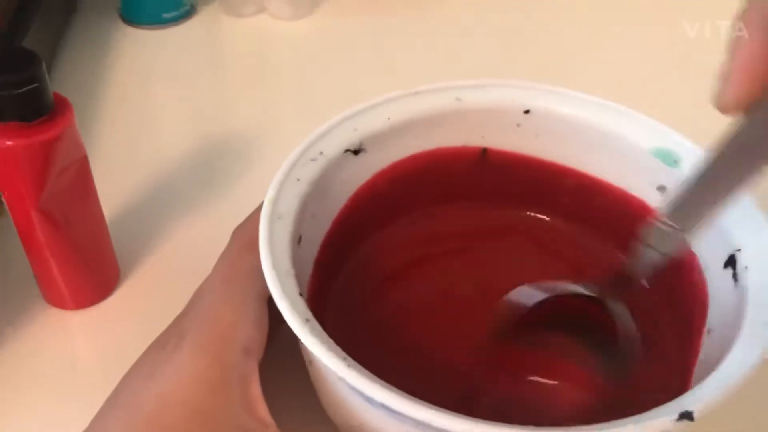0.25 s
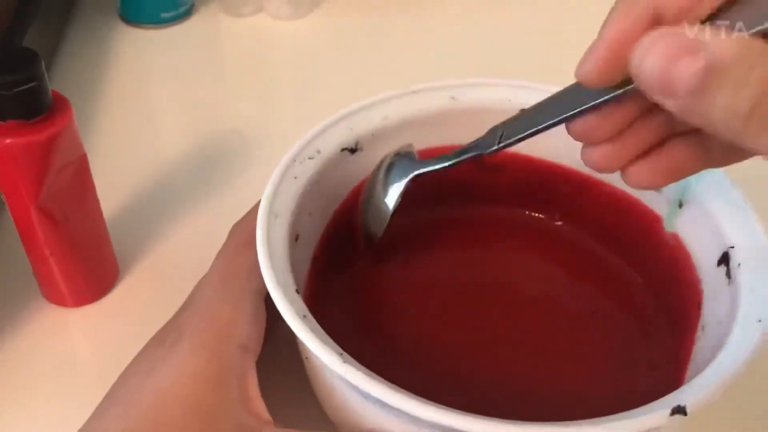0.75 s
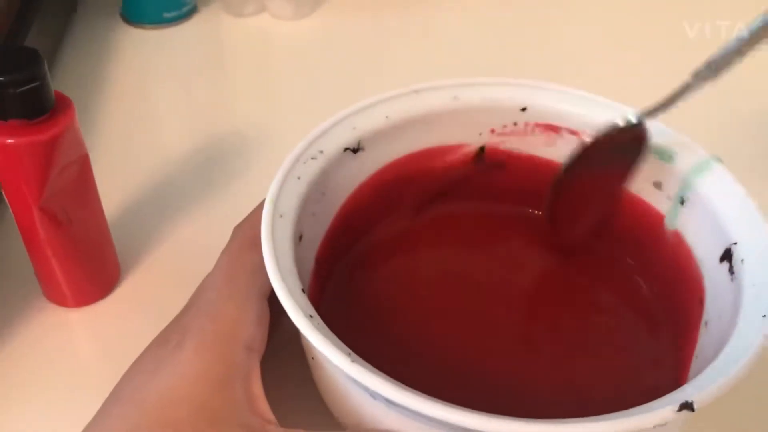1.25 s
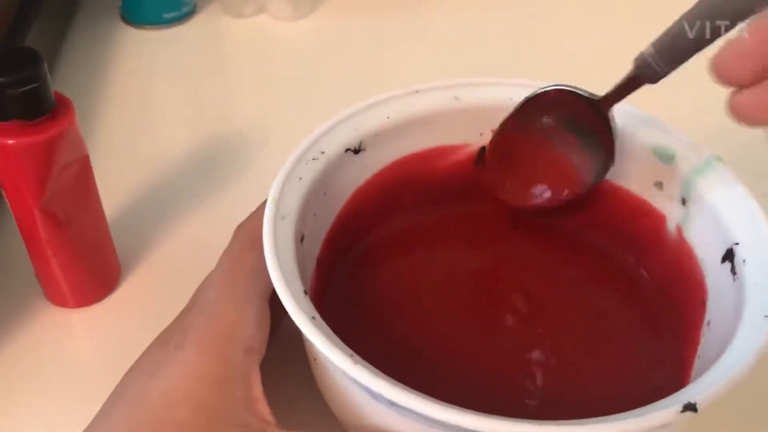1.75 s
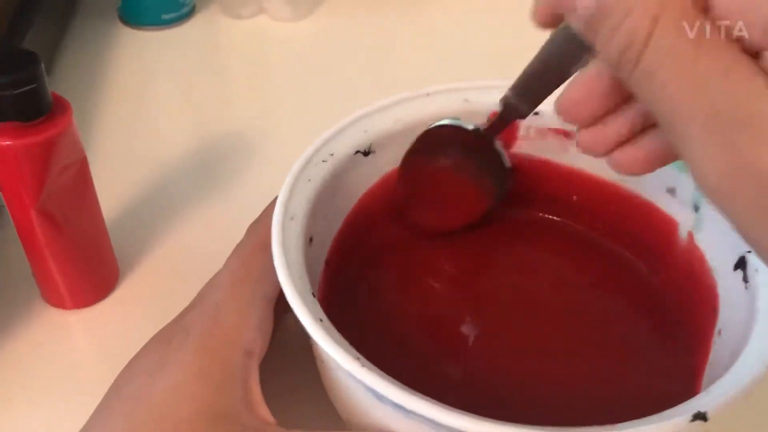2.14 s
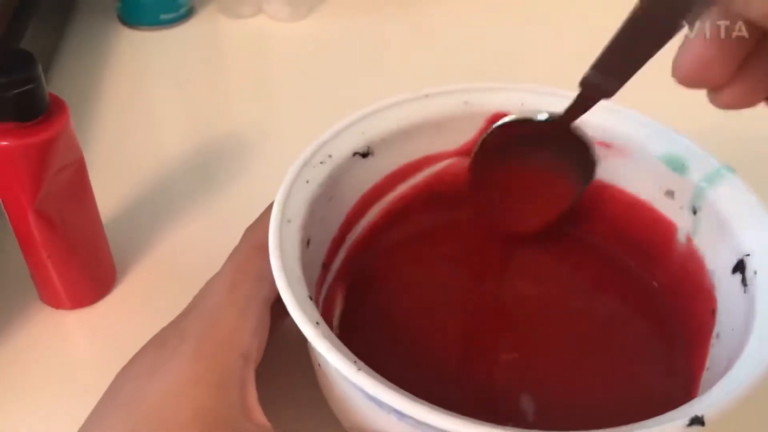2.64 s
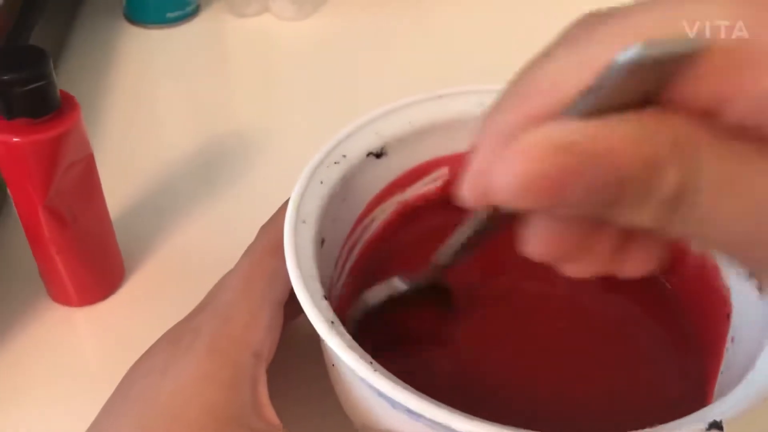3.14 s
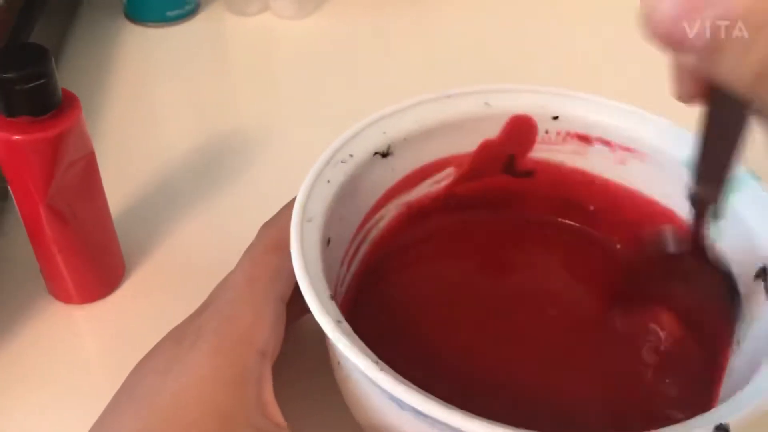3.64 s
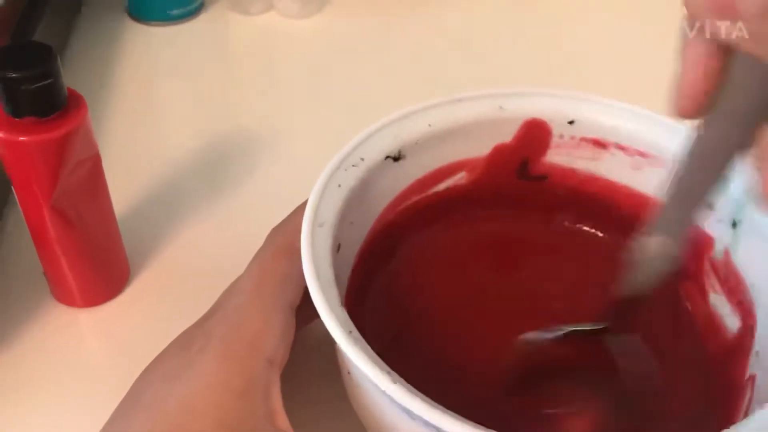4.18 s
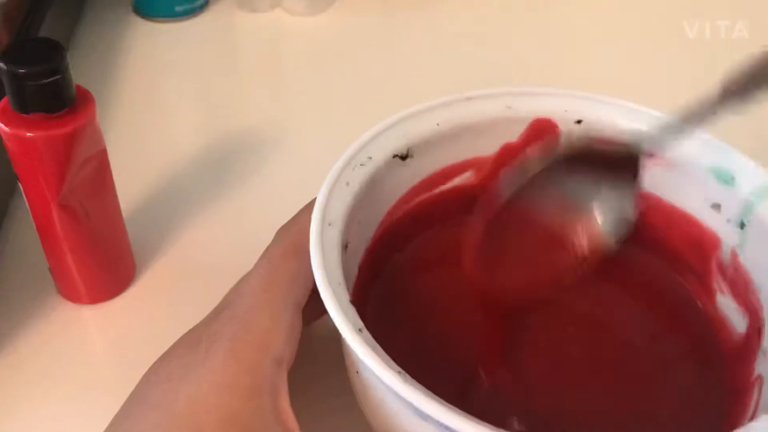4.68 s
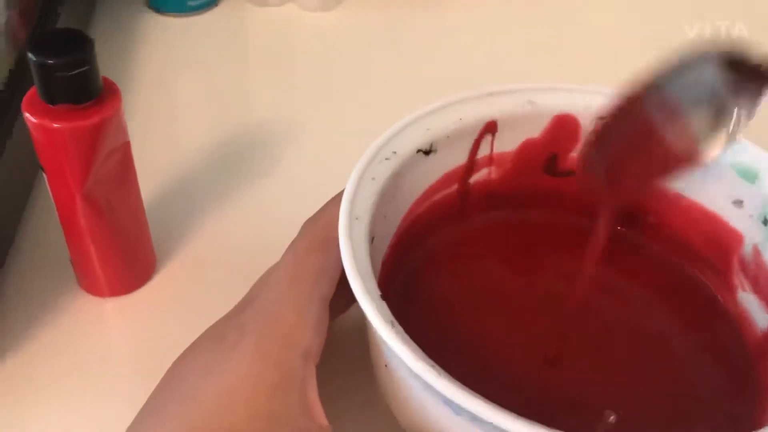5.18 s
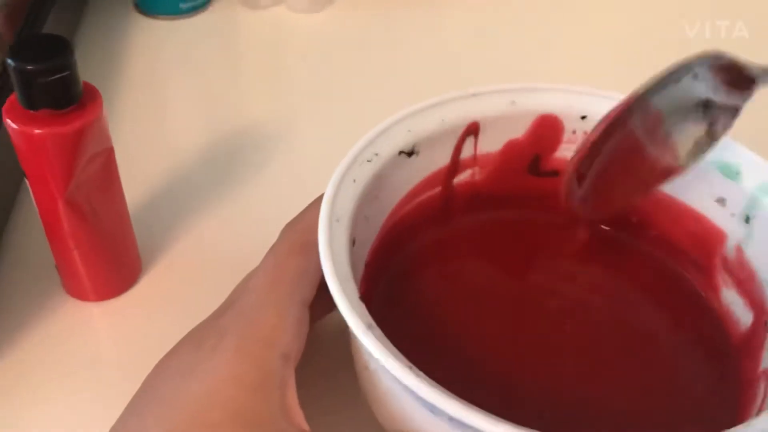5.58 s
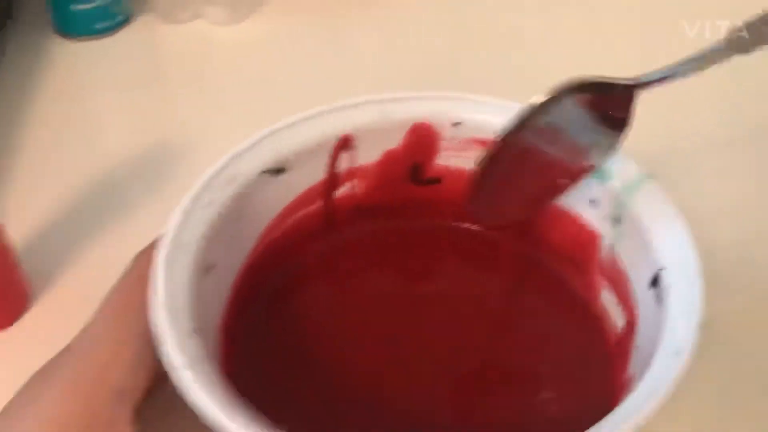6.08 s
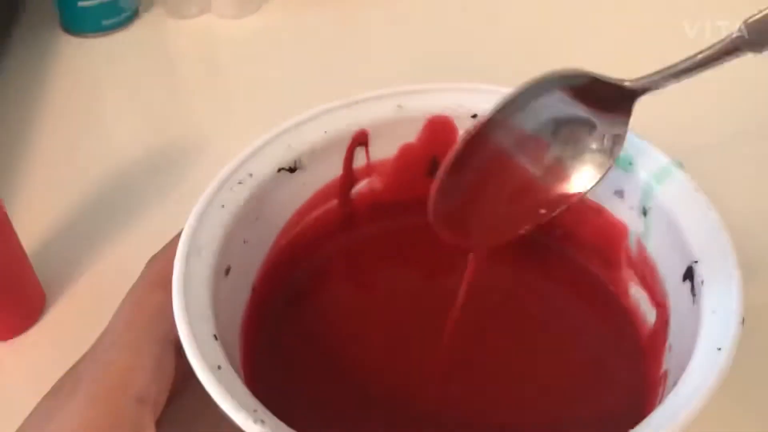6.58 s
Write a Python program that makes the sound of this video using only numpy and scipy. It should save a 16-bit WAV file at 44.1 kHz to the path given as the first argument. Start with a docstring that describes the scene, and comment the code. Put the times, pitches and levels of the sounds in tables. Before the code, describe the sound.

A close phone microphone in a quiet, hard-walled room with faint hum. At 0-0.15 s a steel spoon rasps hard inside a plastic tub of thick slime; distant bird chirps flutter at 0.3-0.5. A knock at 0.77 and a sharper double tap at 1.05 lead into short gritty scrapes until 1.4, with faint bird notes. A dull clank lands at 2.28 with a soft table thud, after bright chirps at 2.1. A low, droning drag leads to the strongest blunt knock at 3.05, then lighter clinks at 3.3 and a cluster at 3.6. From 3.7 to 4.45 scraping is dense, hissy and juddering, with small taps and a loud warbling chirp at 4.3. A thud at 4.9, near silence, a tiny click at 5.67. At 5.95 a bright double clank rings freely with a table thump. Bird squawks echo at 6.25-6.5; a tiny click and faint bump end it.

```python
"""A steel spoon stirs thick slime in a plastic tub, close to a phone microphone: noise shaped by tip, wall and
tub makes the drag, and jolts with decaying sines make the knocks and the steel ring. The tub thuds on the table
(sagging sines with a rumble) and the slime gives three thin popping clicks. A pet bird chirps and squawks far
off in a hard-walled room (gliding overtones with echo), over a faint room hum of shaped noise."""
import sys
import numpy as np
from scipy import signal
from scipy.fft import rfft, irfft, next_fast_len
from scipy.io import wavfile
from scipy.ndimage import uniform_filter1d, map_coordinates

SR = 44100
rng = np.random.default_rng(int(sys.argv[2]) if len(sys.argv) > 2 else 0)


def dump_mix(stems):
    """Bounce the given channels to the path in sys.argv[1] as a 16-bit WAV at rate SR."""
    frames = np.atleast_2d(stems).T  # one column per channel
    limited = np.clip(frames, -1, 1)  # hard clip at full scale
    pcm = np.round(limited * 32767).astype(np.int16)
    wavfile.write(sys.argv[1], SR, pcm)


N = 300762  # samples

# Resonances of the spoon tip under load: f/Hz, width before widening/Hz, relative level/dB
TIP_MODES = [(3860, 320, -1.5), (4370, 150, 1), (5380, 120, 5), (7790, 420, -9), (8680, 260, -3.5),
             (10140, 120, -4.5), (10800, 78, -10), (11940, 250, -5.5), (14000, 1400, -10.5)]
# Resonances of the tub wall: f/Hz, width before widening/Hz, relative level/dB
WALL_MODES = [(734, 46, -11.5), (1129, 59, 2.5), (1410, 120, -2.5), (1906, 88, 2.5), (3420, 190, -9)]
# Resonances of the tub body and its air: f/Hz, width before widening/Hz, relative level/dB
TUB_MODES = [(120, 26, -2), (246, 54, -8.5), (401, 48.6, 1.5)]
# Free modes of the spoon: f/Hz, relative level/dB, ring time scale/s
STEEL_MODES = [(768, -15.5, .3), (1923, 0, .28), (3488, -13, .24), (4170, -35, .3), (5265, -30, .35),
               (5405, -27, .4), (6460, -33, .14), (7600, -42, .25), (8672, -50, .2), (11035, -44, .25),
               (12315, -33, .12)]
# Strokes along the wall: tub drone over the rasp/dB, lean on the wall (-1..1),
# [t/s, hiss of the sliding tip/dB, rasp of the pressed wall/dB], levels before judder
STROKES = [ (-8.5, -0.1, [(0, -51, -40.5), (.05, -47, -46.5), (.1, -40.5, -41.5), (.145, -43, -44.5),
           (.165, -91, -72), (.24, -86, -84)]), (-11.5, 0.86, [(.8, -61.5, -52), (.85, -65, -66),
           (.92, -58, -74.5), (1.02, -57, -53.5), (1.047, -50.5, -41)]), (-16, 0.53, [(1.075, -45, -38.5),
           (1.17, -51, -40), (1.22, -59, -59)]), (1.5, -0.2, [(1.225, -56, -61), (1.27, -50, -53),
           (1.31, -56.5, -51.5), (1.4, -75.5, -64)]), (7.5, 0.4, [(1.78, -89, -68), (1.82, -79, -63.5),
           (1.98, -57.5, -68), (2.1, -55.5, -83), (2.284, -51, -70.5)]), (6.5, -0.1, [(2.3, -57, -46),
           (2.36, -51, -54), (2.44, -70, -70)]), (11, 0.7, [(2.78, -76.5, -68), (2.89, -64, -71),
           (2.94, -48, -69), (3.0, -51.5, -66), (3.052, -51.5, -58.5)]), (7, -0.2, [(3.085, -49.5, -40.5),
           (3.13, -51.5, -51.5), (3.2, -52, -66.5), (3.25, -64, -71)]), (-2.5, 0.2, [(3.69, -42.5, -38),
           (3.78, -57, -44), (3.9, -49, -48), (3.955, -54.5, -43), (4.075, -47.5, -44.5),
           (4.095, -31.5, -40.5), (4.15, -32, -36), (4.195, -60.5, -44), (4.23, -37.5, -41.5),
           (4.29, -52, -53), (4.345, -54.5, -43), (4.39, -50, -49.5), (4.44, -42, -40.5),
           (4.465, -68.5, -72.5), (4.88, -76, -80.5)]), ]
# Bird notes: t/s, length/s, first f/Hz, last f/Hz, relative level/dB, step per overtone/dB, harshness (0..1)
BIRD_NOTES = [(0.305, 0.027, 1570, 1370, -51, -11.5, 0.06), (0.32, .05, 2464, 2470, -51.5, -33, 0.03),
              (0.347, 0.069, 3493, 2650, -46, -22, 0.07), (0.375, 0.026, 2180, 1509, -46, -17, 0.07),
              (0.407, 0.0064, 2840, 2830, -34.5, -27, 0.08), (0.418, 0.0472, 1848, 1604, -46.5, -12, .07),
              (0.439, .07, 2722, 2436, -48, -37, .08), (0.472, 0.037, 2010, 1285, -46.5, -18, .16),
              (0.507, .035, 864, 1026, -57.5, -7.5, 0.08), (0.945, 0.079, 1597, 1464, -53, -7.5, .08),
              (1.367, 0.041, 1270, 1196, -54, -5, 0.07), (1.404, .09, 1017, 994, -52, -8, 0.07),
              (1.503, 0.11, 1216, 1080, -55.5, -8.5, .12), (2.086, 0.033, 3034, 3180, -50, -26, 0),
              (2.092, 0.042, 2308, 1825, -41.5, -24, 0.07), (2.124, 0.034, 3290, 2800, -38, -35, 0.07),
              (2.147, .025, 2750, 3660, -27.5, -24.5, 0.07), (4.265, 0.04, 2016, 2420, -38, -29, 0.1),
              (4.286, .03, 3687, 3140, -33.5, -15, 0.1), (4.306, 0.021, 3155, 3240, -25, -30, 0.03),
              (4.967, 0.031, 2193, 2112, -56, -17, 0.27), (4.97, 0.24, 1575, 1527, -66, -4, .17),
              (5.36, 0.081, 1584, 1502, -68.5, -4.5, 0.22), (6.249, 0.12, 1388, 1523, -43.5, -3, 0.16),
              (6.276, 0.078, 3503, 3525, -30.5, -10, 0.32), (6.335, 0.128, 1007, 1057, -44, -3, 0.01),
              (6.456, 0.084, 1686, 1347, -50, -7, 0.1)]
# Knocks: t/s, relative level/dB, then treble crack, tub and steel ring relative to it/dB,
# share of the ring time left by the slime
KNOCKS = [(0.7681, -18.5, -1.5, -24.5, -11, 0.26), (1.0434, -8.5, -8.5, -21.5, -6.5, 0.21),
          (1.0514, -11, -3, -24, -15.5, 0.25), (1.266, -38.5, -2.5, -6.5, -10, 0.18),
          (1.278, -33, -1, -4, -2.5, 0.16), (2.2826, -7.5, -11, -9, -10, 0.076),
          (2.8796, -48, 13, -9.5, -21.5, 0.68), (2.973, -43.5, 7.5, -13.5, -12, 0.074),
          (3.049, 2, -14, -15.5, -17.5, 0.19), (3.06, -8, -6.5, -5.5, -10.5, 0.18),
          (3.1092, -25.5, -17, -18.5, -1.5, 0.093), (3.302, -17, -10, -22, -8.5, 0.63),
          (3.5805, -19, -4, -19.5, -12, 0.38), (3.5855, -20, -10, -22.5, -3, 0.54),
          (3.6228, -2.5, -9, -10, -14.5, 0.35), (3.6589, -9, -3.5, -11, -9.5, 0.76),
          (3.8644, -17, -22.5, -8.5, -14.5, 0.16), (3.9372, -28, -19.5, -3.5, -7.5, 0.088),
          (3.969, -29, -3.5, -12, -17, 0.19), (3.9752, -15.5, -24, -10.5, -14, 0.095),
          (4.2179, -32.5, -6, -2.5, -8, .15), (4.2662, -32, -1.5, -30, -13.5, 0.19),
          (4.3294, -26.5, -2.5, -38, -7.5, 0.17), (4.36, -18.5, -26, -31, -7.5, 0.13),
          (4.4196, -32.5, -8.5, -34, -1, 0.1), (5.9423, -5, -1.5, -6, -3, 0.97),
          (5.9577, -5.5, -6, -11, -15.5, 0.96), (6.6877, -44.5, -3, 4.5, -17, .3)]
# Tub landing on the table: t/s, relative level/dB, settled f/Hz
THUDS = [(0.8, -47.5, 124), (2.204, -46, 240), (2.299, -30, 122.8), (2.822, -44.5, 129.4),
         (3.058, -31, 119.3), (3.621, -39, 114), (4.902, -30.5, 89), (5.944, -21, 168.6),
         (6.548, -46.5, 485), (6.713, -46.5, 127.4)]
# Tiny dry clicks: t/s, relative level/dB
TICKS = [(2.456, -42.5), (5.668, -47.5), (6.6172, -48.5)]
# Spectrum of the room tone: f/Hz, relative level per Hz/dB
HUM_SPECTRUM = [(25, -31.5), (50, 0), (120, -1.5), (200, -8), (400, -13), (800, -18), (2000, -20),
                (5000, -28), (10000, -31.5), (16000, -29)]
# Reverberation of the room: f/Hz, t60/s
ROOM_DECAY = [(200, .4), (2000, 0.43), (10000, 0.21)]

SLIPS_PER_S, SLIP_DECAY_S, SLIP_DB = 180, 0.0049, -6  # sudden let-goes of the edge; time constant, size over the grit
BEND, WANDER, WANDER_PER_S = .1, .35, 7  # mode shift at full lean (share), wander of the lean, its knots/s
SING_DB, SING_WIDTH_HZ, SING_SPREAD = 13, 26.04, 0.35  # rubbed steel: drive, line width, share of the level spread
SWAY_S = 1.5e-5  # the moving spoon hastens and delays its ring by about this
BIRD_LOW_HZ = 497  # the bird's throat gives little under this
WARBLE_HZ, WARBLE_DEPTH, WARBLE_ABOVE_DB = 189, 0.063, -30.5  # rate, share of the pitch, note level needed
THUD_CYCLES, RUMBLE_CYCLES, THUD_SAG = 10, 34, 0.18  # cycles to lose 60 dB; share by which the pitch starts high
HUM_DB = -65
TOP_HZ = 15900  # band limit of the phone


def amp(db):
    """Decibels to gain."""
    return 10 ** (np.asarray(db) / 20)


def unit(x):
    """Scaled to rms 1."""
    return x / np.sqrt(np.mean(x ** 2) + 1e-20)


def along(points, hz):
    """Interpolate (Hz, value) points on a log frequency axis."""
    f, value = np.transpose(points)
    return np.interp(np.log(hz + 1), np.log(f + 1), value)


def wobble(rate, size=N):
    """A smooth random curve, rate knots a second."""
    knots = rng.standard_normal(int(size * rate / SR) + 4)
    return map_coordinates(knots, [np.arange(size) * rate / SR])


def filtered(x, response):
    """x times a complex response of frequency."""
    m = next_fast_len(N + SR // 2)
    spectrum = rfft(x, m) * response(np.fft.rfftfreq(m, 1 / SR))
    return irfft(spectrum, m)[..., :N]


def body(modes, widen):
    """Causal response of a set of resonances with alternating sign."""
    def response(f):
        total = 0
        for k, (centre, width, db) in enumerate(modes):
            damping = 1j * f * width * widen
            total = total + (-1) ** k * amp(db) * damping / (centre * centre - f * f + damping)
        return total
    return response


def add(track, s, sound):
    """Mix a sound into the track at s seconds."""
    part = track[round(s * SR):][:len(sound)]
    part += sound[:len(part)]


def room(x, delay):
    """The room's answer after delay seconds: noise in which each frequency dies at its own speed."""
    hz, t, z = signal.stft(rng.standard_normal(SR // 2), SR, nperseg=256)
    decay = amp(-60 * t / along(ROOM_DECAY, hz)[:, None])
    tail = signal.istft(z * decay, SR, nperseg=256)[1]
    delayed = np.pad(x, (round(delay * SR), 0))
    return signal.fftconvolve(delayed, tail / np.linalg.norm(tail))[:len(x)]


def patchy(x, depth_db):
    """Random gain patches in time and frequency."""
    z = signal.stft(x, nperseg=256)[2]
    field = uniform_filter1d(rng.standard_normal(z.shape), size=4, axis=-2)
    field = uniform_filter1d(field, size=16, axis=-1)
    return signal.istft(z * amp(depth_db * unit(field)), nperseg=256)[1][..., :N]


def leaning(x, modes, lean, widen):
    """Resonances that slide up and down with the lean, cross-faded between three settings."""
    total = 0
    for k in (-1, 0, 1):
        share = np.maximum(1 - abs(lean - k), 0)
        total = total + share * filtered(x, lambda f: body(modes, widen)(f / (1 + BEND * k)))
    return unit(total)


def stroke_levels():
    """Gain of tip, wall and tub, and lean, per sample; between strokes the spoon is off the wall."""
    gain, lean, t = np.zeros((3, N)), np.zeros(N), np.arange(N) / SR
    for tub_db, push, stroke in STROKES:
        s, hiss, rasp = np.transpose(stroke)
        curves = (hiss, rasp, rasp + tub_db)  # the tub drones with the wall's rasp
        gain += amp([np.interp(t, s, c, left=-150, right=-150) for c in curves])
        lean[t >= s[0]] = push
    return uniform_filter1d(gain, size=300, axis=1, mode="nearest"), lean


def drag():
    """Stick-slip grit, uneven in size, shakes tip, wall and tub together; the rubbed steel sings on its modes."""
    slips = (rng.random(N) < SLIPS_PER_S / SR) * rng.rayleigh(size=N)
    slips = signal.fftconvolve(slips, np.exp(-np.arange(SR // 20) / (SLIP_DECAY_S * SR)))[:N]
    judder_db = 0.77 * wobble(35) + 1.6 * wobble(150)  # the edge catches and lets go
    # the contact point wanders, so the favoured modes change
    noise = patchy(rng.standard_normal((3, N)), depth_db=4.0)
    grit = amp(judder_db) * (1 + amp(SLIP_DB) * slips) * noise

    gain, lean = stroke_levels()
    lean = np.clip(lean + WANDER * wobble(WANDER_PER_S), -1, 1)
    tip = unit(filtered(grit[0], body(TIP_MODES, widen=1.7)))
    wall = leaning(grit[1], WALL_MODES, lean, widen=1.0)
    tub = leaning(grit[2], TUB_MODES, lean, widen=1.0)
    gain = gain * amp([[0], [1.6], [1.4]] * wobble(90))  # wall and tub shudder in lumps

    lines = [(hz, SING_WIDTH_HZ, db * SING_SPREAD) for hz, db, _ in STEEL_MODES]
    rubbing = gain[0] * rng.standard_normal(N)
    sing = amp(SING_DB) * filtered(rubbing, body(lines, widen=1.0))
    return (gain * [tip, wall, tub]).sum(0) + sing


def hum():
    """Steady room tone, shaped noise whose level wavers a little."""
    noise = unit(filtered(rng.standard_normal(N), lambda hz: amp(along(HUM_SPECTRUM, hz))))
    return amp(HUM_DB + 0.6 * wobble(3.0)) * noise


def bird():
    """Gliding notes with overtones; harshness shakes the pitch, the loudest warble; a strong room echo follows."""
    out = np.zeros(N)
    k = np.arange(1, 15)[:, None]  # harmonic number
    for s, length, first_hz, last_hz, db, step_db, harsh in BIRD_NOTES:
        u = np.arange(round(length * SR)) / (length * SR)  # progress through the note, 0..1
        pitch = first_hz + (last_hz - first_hz) * u
        pitch = pitch * (1 + harsh * wobble(450, size=len(u)))
        warble = (db > WARBLE_ABOVE_DB) * np.sin(2 * np.pi * WARBLE_HZ * u * length)
        phase = 2 * np.pi * np.cumsum(pitch * (1 + WARBLE_DEPTH * warble)) / SR
        overtones = amp(step_db * (k - 1)) * np.sin(k * phase)
        tone = (overtones * (k * first_hz < SR / 3)).sum(0)
        attack = np.minimum(u / (0.033 + 4 * harsh ** 2), 1)  # harsh notes swell more slowly
        add(out, s, amp(db) * attack * (1 - u ** 4) * tone)
    out = filtered(out, lambda hz: (1j * hz / (BIRD_LOW_HZ + 1j * hz)) ** 4)
    return amp(1.5) * out + room(out, .004)


def knocks():
    """Each knock rings the steel, cut short by the slime, and jolts wall, tip and tub with a short burst."""
    ring, jolts, t = np.zeros(N), np.zeros((3, N)), np.arange(SR // 3) / SR
    hz, level, ring_s = np.transpose(STEEL_MODES)[..., None]
    twins = np.sin(2 * np.pi * (hz + 4) * t)  # the handle's modes lie 4 Hz off and beat with the bowl's
    flash = amp(level / 1.6 - 2.5 - 60 * t / 0.047) * (hz > 3000)  # the bowl answers brightly at first
    handle_level = np.minimum(level - 14, -35 + 4 * np.log2(hz / 1900))
    t_puff = t[:SR // 10]
    puff = amp(-60 * t_puff / np.array([[.03], [.02], [.06]]))  # wall, tip, tub: seconds to lose 60 dB
    puff = puff * (1 - np.exp(-t_puff / 0.0015))
    for s, db, crack_db, tub_db, ring_db, free in KNOCKS:
        chance_db = 0.97 * rng.standard_normal((len(STEEL_MODES), 1))
        spent = t / (ring_s * np.clip(free, .03, 1.5))  # time in units of the ring time
        flutter_db = 2.6 * np.array([wobble(60, size=len(t)) for _ in STEEL_MODES])  # from the grip
        # the handle rings on after the bowl is damped
        handle = amp(handle_level) * amp(-21 * spent + flutter_db) * twins
        modes = np.sin(2 * np.pi * hz * (t + SWAY_S * wobble(71, size=len(t))))
        # fingers and slime close in on the steel, so the ring dies ever faster
        fade = amp(level - 90.5 * spent * np.sqrt(spent)) + amp(crack_db + 11.0) * flash
        steel = (amp(chance_db) * (fade * modes + handle)).sum(0)
        add(ring, s, amp(db + ring_db) * steel)
        bursts = rng.standard_normal(puff.shape) * puff
        gains_db = (db + 6.0, db + crack_db + 13.5, db + tub_db + 17.5)
        for track, burst, gain_db in zip(jolts, bursts, gains_db):
            add(track, s, amp(gain_db) * burst)
    wall = filtered(jolts[0], body(WALL_MODES, widen=3))
    tip = filtered(jolts[1], body(TIP_MODES, widen=1.6))
    tub = filtered(jolts[2], body(TUB_MODES, widen=1.5))
    return ring, wall + tip + tub


def thuds():
    """The tub rocks and lands on the table top, a short sagging push with a longer rumble."""
    out, t = np.zeros(N), np.arange(SR // 3) / SR
    for s, db, hz in THUDS:
        rumble = unit(np.gradient(wobble(2.6 * hz, size=len(t))))
        phase = 2 * np.pi * hz * np.cumsum(1 + THUD_SAG * np.exp(-t * hz / 1.5)) / SR
        push = amp(-60 * t * hz / THUD_CYCLES) * np.sin(phase)
        push = push + .3 * amp(-60 * t * hz / RUMBLE_CYCLES) * rumble
        onset = 1 - np.exp(-t / 0.0052)
        add(out, s, amp(db + 6.5) * onset * push)
    return out


def ticks():
    """Thin clicks with no body: differenced noise that dies within 2 ms."""
    out, t = np.zeros(N), np.arange(200) / SR
    for s, db in TICKS:
        noise = np.diff(rng.standard_normal(len(t) + 1))
        add(out, s, amp(db + 0.5 - 60 * t / 0.0019) * noise)
    return out


def scene():
    """Up close, the tub is heard with some room, the thin spoon with less; the far bird brings its own."""
    ring, shells = knocks()
    tub = drag() + shells + thuds() + ticks()
    echo = room(amp(-14.0) * tub + amp(-20.5) * ring, 0.0064)
    return (tub + ring + echo + bird() + hum())[None]


def record(dry):
    """The phone drops the deepest bass, rounds off the loudest peaks and keeps nothing above its band limit."""
    thin = filtered(dry, lambda hz: (1j * hz / (40 + 1j * hz)) ** 3)
    soft = thin / (1 + np.abs(thin / .95) ** 6) ** (1 / 6)
    return filtered(soft, lambda hz: hz < TOP_HZ)


dry = scene()
out = record(dry)
dump_mix(out)
```